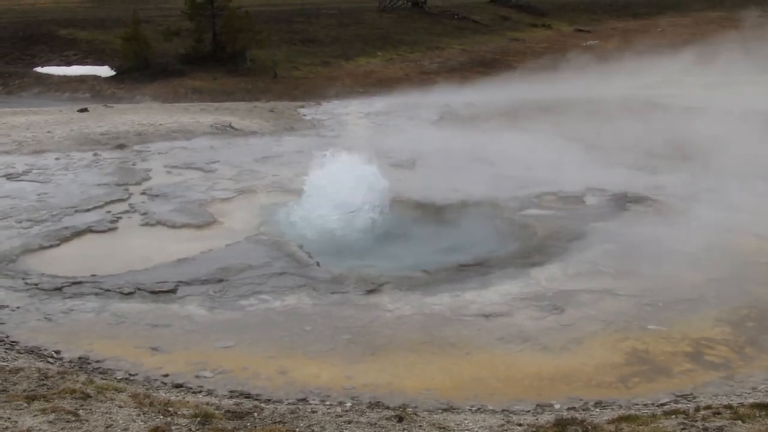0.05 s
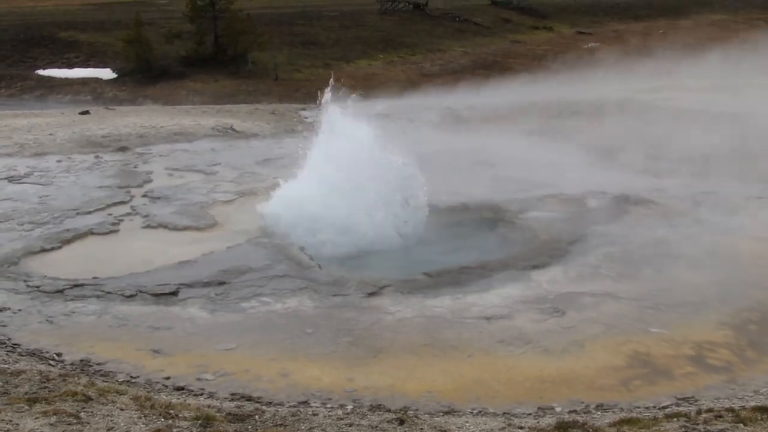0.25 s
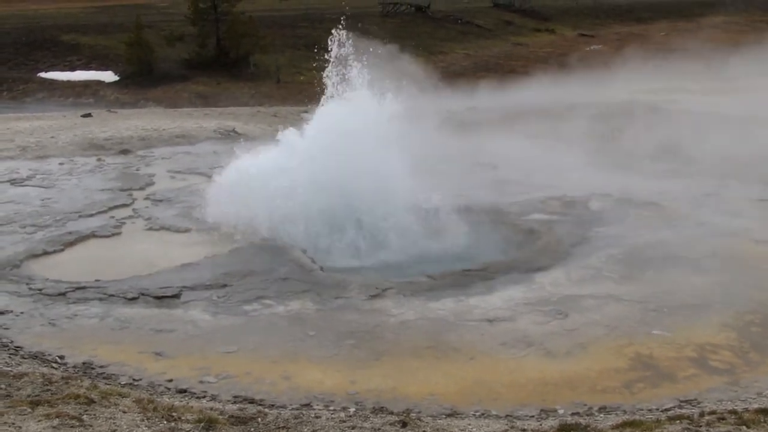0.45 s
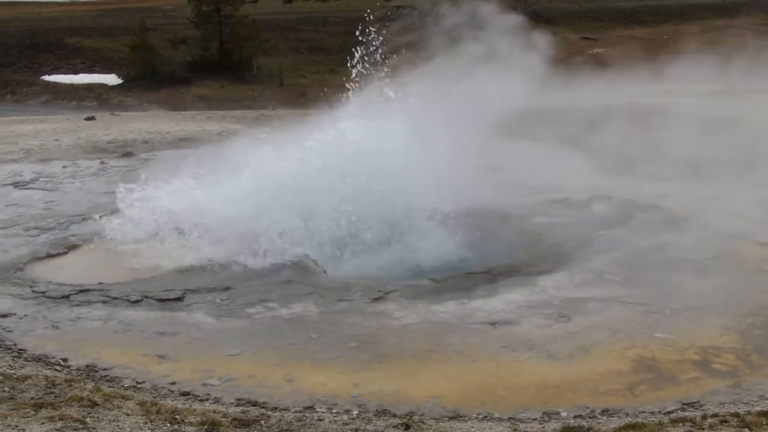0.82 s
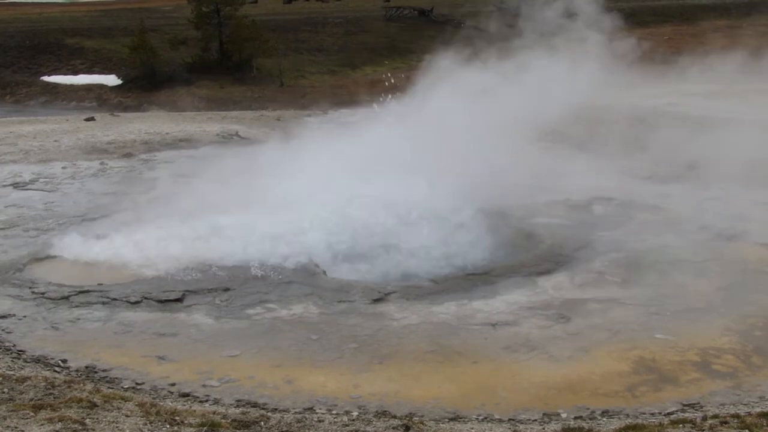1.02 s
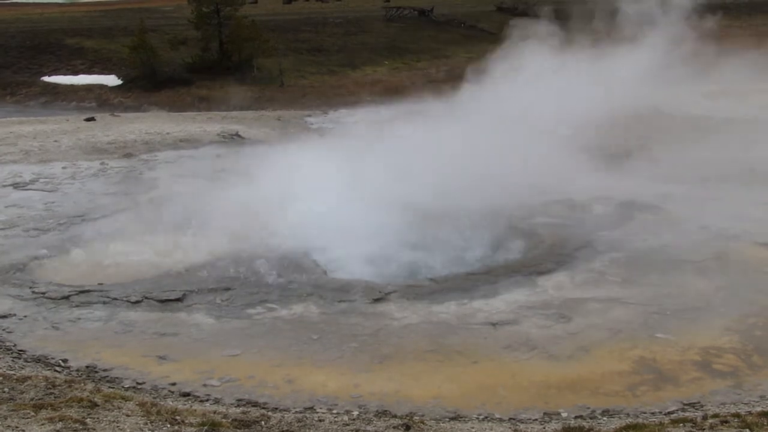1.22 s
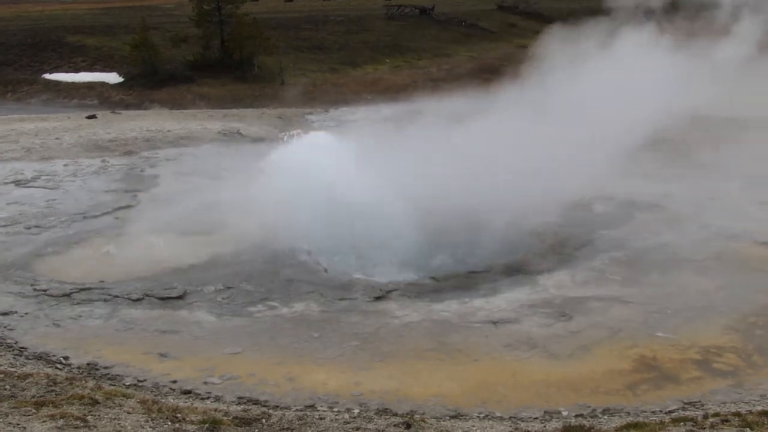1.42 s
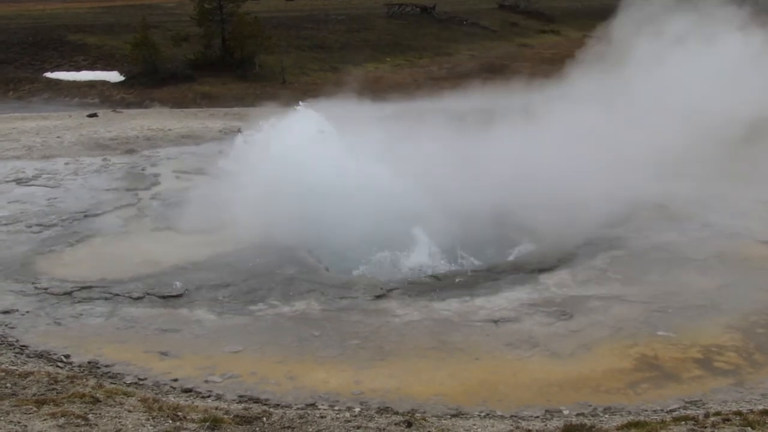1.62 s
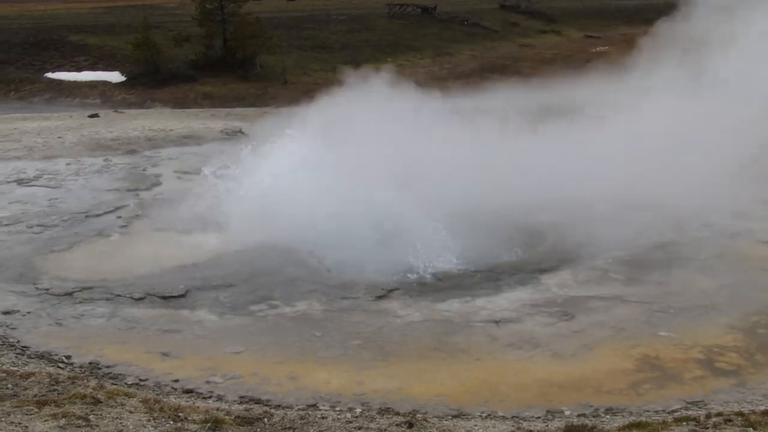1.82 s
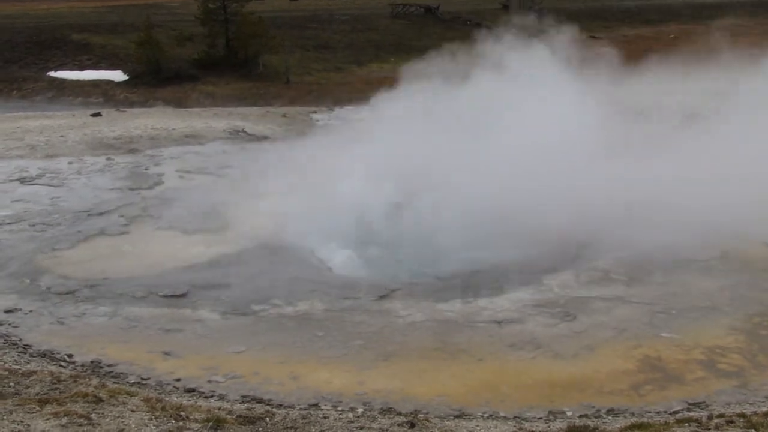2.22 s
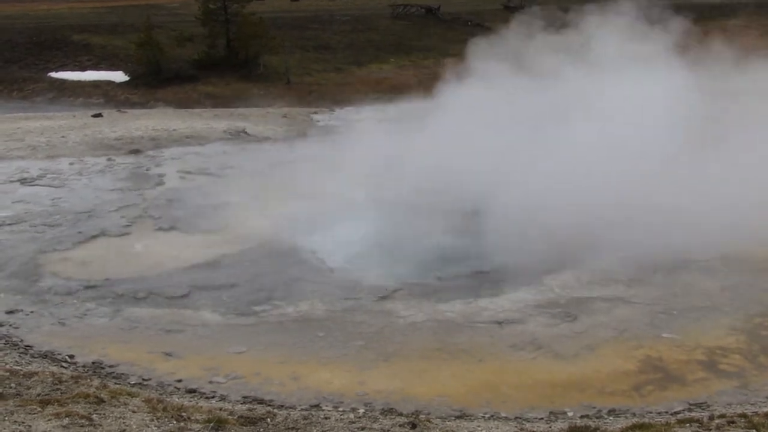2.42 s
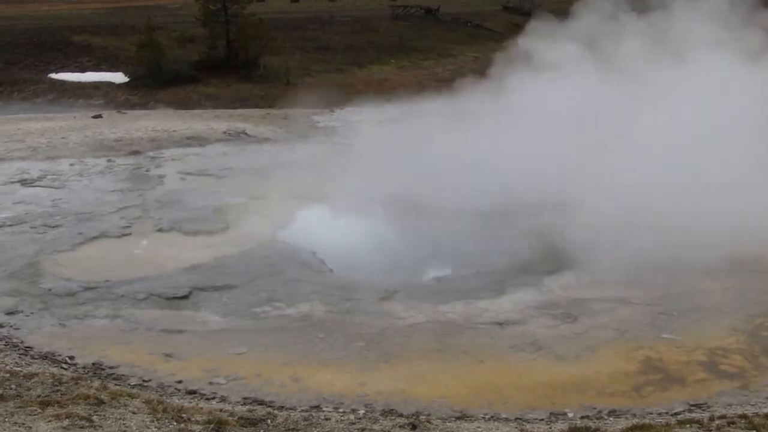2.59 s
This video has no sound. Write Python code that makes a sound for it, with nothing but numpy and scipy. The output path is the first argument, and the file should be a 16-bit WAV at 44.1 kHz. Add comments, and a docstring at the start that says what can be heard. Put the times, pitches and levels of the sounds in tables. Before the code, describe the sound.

A geyser surges twice, water splashing back into its pool, with wind buffeting the microphone.

```python
"""Wind buffets two microphone ports in short low thumps from the first instant to the last.
A geyser's first surge rains onto pool and rock, swelling to a peak near 1 s: impacts patter, trapped
bubbles resonate, the pool churns and fine spray hisses on top, while heavier lumps of water slap down.
The fall eases, then a weaker surge peaks near 2 s. As it dies away, three near drops tick."""
import sys
import numpy as np
from scipy import signal
from scipy.fft import rfft, irfft
from scipy.io import wavfile

SR = 44100
rng = np.random.default_rng(int(sys.argv[2]) if len(sys.argv) > 2 else 0)


def generate_wav(signal):
    """Clip the signal to [-1, 1] and save it as 16-bit WAV at the path in sys.argv[1]."""
    frames = np.transpose(np.atleast_2d(signal))
    scaled = np.clip(frames, -1, 1) * 32767
    pcm = np.round(scaled).astype(np.int16)
    wavfile.write(sys.argv[1], SR, pcm)


N = 121275
TIME = np.arange(N) / SR
FREQS = np.fft.rfftfreq(N, 1 / SR)

# Envelopes of the falling water, spray, churning pool and wind: time_s, relative_level_db
FALL_ENVELOPE = [(0, -51.5), (.15, -48.5), (.22, -38), (.3, -40), (.37, -36.5), (.56, -35.5), (.67, -31),
                 (.74, -31), (.82, -26), (.89, -25), (.97, -21.5), (1.07, -25.5), (1.2, -31), (1.38, -33),
                 (1.47, -36), (1.56, -33.5), (1.63, -38.5), (1.72, -34.5), (1.85, -32), (1.99, -28),
                 (2.06, -32.5), (2.13, -39), (2.28, -40.5), (2.38, -38), (2.48, -43.5), (2.59, -41.5),
                 (2.64, -40), (2.75, -43.5)]
SPRAY_ENVELOPE = [(0, -69), (.15, -61), (.215, -52), (.27, -52.5), (.45, -46), (.72, -41.5), (.86, -36),
                  (1.06, -34), (1.14, -39.5), (1.21, -45), (1.39, -47.5), (1.5, -48.5), (1.56, -47.5),
                  (1.66, -46.5), (1.86, -40.5), (1.93, -40), (2.01, -41), (2.13, -52.5), (2.29, -52),
                  (2.32, -50), (2.44, -52.5), (2.58, -57.5), (2.75, -55.5)]
CHURN_ENVELOPE = [(0, -46.5), (.12, -45.5), (.19, -38), (.33, -37), (.55, -38.5), (.71, -40), (.82, -31.5),
                  (.9, -31.5), (.98, -31), (1.08, -30), (1.2, -35), (1.47, -40), (1.57, -36.5),
                  (1.67, -41.5), (1.8, -33), (1.97, -31.5), (2.05, -34.5), (2.14, -41), (2.26, -45),
                  (2.4, -37.5), (2.46, -43.5), (2.75, -40)]
WIND_ENVELOPE = [(0, -26), (.2, -36.5), (.4, -33.5), (.45, -38.5), (.6, -30.5), (.72, -33), (.8, -37),
                 (.93, -37), (1.05, -30.5), (1.22, -33), (1.32, -39.5), (1.64, -31.5), (1.72, -50),
                 (1.84, -37.5), (1.95, -40.5), (2.12, -42.5), (2.3, -39.5), (2.4, -37), (2.51, -30.5),
                 (2.65, -45), (2.75, -37)]
# Spectral shaping of the same four sources, then of the near drops: frequency_hz, gain_db
FALL_COLOUR = [(300, -21), (700, -2), (920, -4.5), (1120, 1.5), (1480, -3.5), (1790, 0), (2030, -3.5),
               (2250, -2.5), (2900, -5.5), (3200, -13.5), (3900, -15), (5500, -19), (12000, -50)]
SPRAY_COLOUR = [(1500, -10), (3200, 9.5), (4500, 2.5), (6000, 1.5), (8000, -1.5), (10800, -1.5),
                (12500, -7.5)]
CHURN_COLOUR = [(40, -38), (120, 1), (260, -2), (390, -14), (490, -7), (700, -4.5), (900, -14.5),
                (1400, -26.5)]
WIND_COLOUR = [(25, -23), (42, -11), (80, -11.5), (140, 0), (250, 0.5), (330, -6.5), (450, -8), (700, -19),
               (1200, -23.5), (3000, -44), (8000, -56)]
DROP_COLOUR = [(1500, -20), (4500, 6.5), (12000, -5)]
# Lumps of water slapping down: start_s, relative_level_db, decay_s, pitch_hz
SLOPS = [(.035, -32, 0.002, 1110), (.101, -36.5, 0.0021, 940), (0.209, -36, 0.053, 1030),
         (.8, -28, 0.011, 630), (.945, -28, 0.12, 795), (1.042, -21.5, 0.011, 3200),
         (1.305, -29, 0.019, 1400), (1.548, -24.5, 0.011, 3440), (1.568, -29, 0.017, 1230),
         (1.801, -29.5, 0.0055, 1100), (1.913, -35, 0.0042, 800), (1.954, -35, 0.024, 1230),
         (2.304, -27, 0.0093, 1120), (2.326, -36, .025, 1180), (2.33, -31.5, 0.021, 3380),
         (2.511, -36.5, 0.011, 600), (2.609, -28, 0.0064, 1490)]
# Single drops landing nearby: start_s, relative_level_db
NEAR_DROPS = [(2.157, -30), (2.174, -31.5), (2.549, -38)]
# Eddies striking a port (0 left, 1 right): centre_s, relative_level_db, width_s, pitch_hz, port
EDDIES = [(.024, -18, 0.015, 270, 0), (.065, -10, 0.0042, 253, 0), (0.117, -19, 0.0027, 310, 1),
          (0.141, -17, 0.013, 236, 1), (0.208, -15.5, 0.0093, 252, 0), (0.332, -19, 0.0052, 219, 0),
          (.491, -18, 0.0079, 387, 0), (0.529, -14, 0.0045, 323, 0), (0.556, -12, 0.0088, 278, 0),
          (0.681, -20, 0.0073, 233, 0), (0.732, -18, 0.023, 180, 1), (.823, -22, 0.0034, 295, 0),
          (0.871, -16, 0.0081, 328, 0), (1.018, -19, 0.0032, 275, 0), (1.257, -19.5, 0.012, 295, 0),
          (1.392, -9.5, 0.0048, 272, 0), (1.416, -14.5, 0.0078, 252, 0), (1.437, -9, 0.009, 264, 0),
          (1.512, -11.5, 0.0073, 246, 0), (1.602, -20, 0.023, 220, 0), (1.797, -18, 0.009, 231, 0),
          (1.814, -9, 0.0067, 320, 0), (1.874, -15, 0.0037, 262, 0), (2.054, -15.5, 0.0065, 280, 0),
          (2.249, -20.5, 0.0089, 247, 0), (2.342, -17, 0.0071, 257, 0), (2.38, -19.5, .02, 306, 0),
          (2.402, -11, 0.0036, 260, 0), (2.469, -9.5, 0.0036, 300, 0), (2.7, -17.5, 0.01, 200, 0)]
# Stereo width of the water: frequency_hz, side_gain_db
SIDE_GAIN = [(200, -25), (700, -18.5), (1800, -14), (2800, -8), (4000, -5), (5200, -7.5), (8000, -4),
             (12000, -9)]
# Level difference of the water between channels: frequency_hz, left_minus_right_db
LEVEL_DIFFERENCE = [(600, -0.8), (1250, -0.5), (1900, -2.2), (2600, -5), (3100, -6), (4500, 2), (6000, 0),
                    (8200, -1.5), (10500, 0.4)]
# Phase difference of the water between channels: frequency_hz, left_lead_rad
PHASE_DIFFERENCE = [(1200, -0.46), (2300, -0.23), (3600, 0.49), (4400, -0.0048), (5500, 0.5), (7500, -0.18),
                    (8700, .55), (11000, .1)]


def falling_water():
    """Impact and bubble resonance: drops land in clumps, and some trap air that rings a little longer."""
    impacts = patter(540, 7220, per_s=3500, spread_db=2, q=2.06, wash=1, clump_db=2.35, bands=24)
    bubbles = patter(766, 3760, per_s=830, spread_db=1, q=10.6, wash=.043, clump_db=1.9, bands=30)
    water = rms_one(tint(impacts + from_db(-9) * bubbles, FALL_COLOUR))
    return water * envelope(FALL_ENVELOPE) * from_db(.5 * drift(20))


def spray(gain_db=4):
    """Incoherent addition: countless fine droplets merge into a fluttering hiss."""
    hiss = rms_one(tint(rng.standard_normal((2, N)), SPRAY_COLOUR))
    return hiss * envelope(SPRAY_ENVELOPE) * from_db(gain_db + drift(18))


def spatter(per_s=120, decay_s=.0007, gain_db=-7.5):
    """Shot noise: nearer droplets of uneven size tick at random, rising and falling with the spray."""
    sizes = (rng.random(N) < per_s / SR) * rng.uniform(.2, 1, N) ** 2
    decays = signal.lfilter([1], [1, -np.exp(-1 / (decay_s * SR))], sizes + 1e-18)
    ticks = decays * rng.standard_normal((2, N))
    return rms_one(tint(ticks, SPRAY_COLOUR)) * envelope(SPRAY_ENVELOPE) * from_db(gain_db)


def churn(gain_db=.5):
    """Bubble resonance: large bubbles ring low where the water plunges into the pool."""
    bubbles = patter(300.7, 1376, per_s=1100, spread_db=2.5, q=8.4, wash=.69, clump_db=0, bands=18)
    churning = rms_one(tint(bubbles, CHURN_COLOUR))
    return churning * envelope(CHURN_ENVELOPE) * from_db(gain_db + .44 * drift(33))


def slops(q=1.6, slap_db=.5):
    """Damped resonance: each lump of water excites one broad pitch with a slap and a short splash."""
    lumps = np.zeros((2, N))
    for start_s, level_db, decay_s, pitch_hz in SLOPS:
        ring_samples = SR * q / (np.pi * pitch_hz)
        drive = np.sqrt(ring_samples) * burst(start_s, attack_s=.00067, decay_s=decay_s)
        drive[0, int(start_s * SR)] += from_db(slap_db) * ring_samples / 2   # first contact
        lumps += from_db(level_db) * resonate(drive, pitch_hz, q)
    return tint(lumps, [(200, -2), (500, 7), (3500, -4.5), (6000, -9.5), (12000, -12)])


def near_drops():
    """A brief impact has a broad spectrum: each near drop is a bright tick."""
    ticks = sum(from_db(level_db) * burst(start_s, attack_s=.00036, decay_s=.0019)
                for start_s, level_db in NEAR_DROPS)
    return tint(ticks, DROP_COLOUR)


def wind(left_db=2.5, right_db=-8, eddy_db=-1.5, rumble_db=-7, crossfeed=.5):
    """Turbulent pressure at the ports: a lumpy rumble, with eddies that thump for a few uneven cycles."""
    turbulence = [rng.standard_normal(N) * from_db(2 * drift(64)) for _ in range(2)]
    ports = np.array([rms_one(tint(pressure, WIND_COLOUR)) for pressure in turbulence])
    ports *= envelope(WIND_ENVELOPE) * from_db([[left_db], [right_db]])
    wobble_rad = drift(65)
    rumble = from_db(rumble_db) * rms_one(tint(rng.standard_normal(N), WIND_COLOUR))
    for centre_s, level_db, width_s, pitch_hz, port in EDDIES:
        near = np.abs(TIME - centre_s) < 3 * width_s
        offset_s = TIME[near] - centre_s
        thump = np.cos(2 * np.pi * (pitch_hz * offset_s + rng.random()) + wobble_rad[near])
        swell = np.exp(-2 * (offset_s / width_s) ** 2)
        ports[port, near] += from_db(level_db + eddy_db) * (thump + rumble[near]) * swell
    return ports - crossfeed * ports[::-1]   # each port also reaches the other channel, inverted


def patter(low_hz, high_hz, per_s, spread_db, q, wash, clump_db, bands):
    """Superposition: random impulses ring in resonant bands over a wash of noise, as (mid, side)."""
    ringing = np.zeros((2, N))
    for pitch_hz in np.geomspace(low_hz, high_hz, bands):
        hits = rng.random(N) < per_s / bands / SR
        size_db = spread_db * np.minimum(rng.exponential(1, N), 3.5) + clump_db * drift(26)
        mid = hits * from_db(size_db) * rng.choice([-1, 1], N)
        side = mid * rng.standard_normal(N)   # each hit has its own place
        ringing += np.sqrt(pitch_hz) * rms_one(resonate(np.array([mid, side]), pitch_hz, q))
    return rms_one(ringing) + wash * rng.standard_normal((2, N))


def burst(start_s, attack_s, decay_s):
    """Exponential decay of noise after a linear rise, as (mid, side)."""
    age_s = np.maximum(TIME - start_s, 0)
    rise = np.minimum(age_s / attack_s, 1)
    decay = np.exp(-np.maximum(age_s - attack_s, 0) / decay_s)
    return rng.standard_normal((2, N)) * rise * decay


def resonate(x, pitch_hz, q):
    """Second-order resonance with a peak gain of 1."""
    radius = np.exp(-np.pi * pitch_hz / q / SR)
    gain = (1 - radius ** 2) / 2
    feedback = [1, -2 * radius * np.cos(2 * np.pi * pitch_hz / SR), radius ** 2]
    return signal.lfilter([gain, 0, -gain], feedback, x + 1e-18)


def drift(corner_hz):
    """Low-pass filtered noise: a slow wander of rms 1."""
    hop, settle = 40, 2000
    pole = np.exp(-2 * np.pi * corner_hz * hop / SR)
    noise = rng.standard_normal(N // hop + settle + 2)
    slow = signal.lfilter([1], [1, -2 * pole, pole ** 2], noise)[settle:]
    return np.interp(np.arange(N) / hop, np.arange(len(slow)), rms_one(slow))


def tint(x, curve):
    """Zero-phase filtering by rows of frequency_hz, gain_db."""
    frequency_hz, gain_db = np.transpose(curve)
    response = from_db(np.interp(np.log(FREQS + 1), np.log(frequency_hz), gain_db))
    return irfft(rfft(x) * response, N)


def envelope(rows):
    """Amplitude by interpolation between rows of time_s, level_db."""
    return from_db(np.interp(TIME, *np.transpose(rows)))


def from_db(db):
    """Amplitude ratio from decibels."""
    return 10 ** (np.asarray(db) / 20)


def rms_one(x):
    """Normalisation to rms 1."""
    return x / np.sqrt(np.mean(x ** 2) + 1e-20)


def place(water):
    """Level and phase differences spread (mid, side) water sound between left and right."""
    mid, side = water[0], tint(water[1], SIDE_GAIN)
    left = tint(mid + side, [(hz, db / 2) for hz, db in LEVEL_DIFFERENCE])
    right = tint(mid - side, [(hz, -db / 2) for hz, db in LEVEL_DIFFERENCE])
    lead_rad = np.interp(FREQS, *np.transpose(PHASE_DIFFERENCE))
    phase_shift = np.exp(.5j * np.array([lead_rad, -lead_rad]))
    return irfft(rfft(np.array([left, right])) * phase_shift, N)


def scene():
    """Superposition of the geyser in front and the wind at the microphone."""
    water = falling_water() + spray() + spatter() + churn() + slops() + near_drops()
    return place(water) + wind()


def record(dry):
    """Band limiting: the microphone thins the deep bass, and the top is cut steeply."""
    low_cut_hz, stopband_hz = 86, 13200
    high_pass = signal.butter(2, low_cut_hz, "high", fs=SR, output="sos")
    low_pass = signal.cheby2(16, 45, stopband_hz, fs=SR, output="sos")
    return signal.sosfiltfilt(low_pass, signal.sosfilt(high_pass, dry))


dry = scene()
out = record(dry)
generate_wav(out)
```